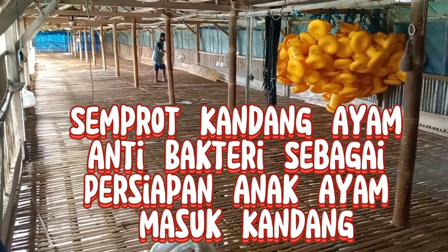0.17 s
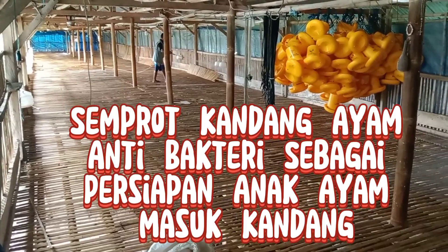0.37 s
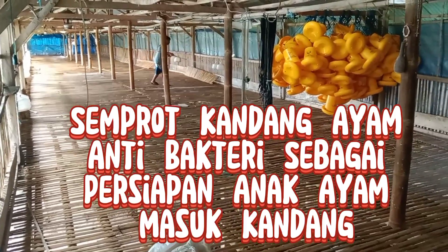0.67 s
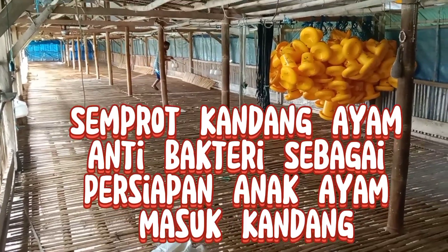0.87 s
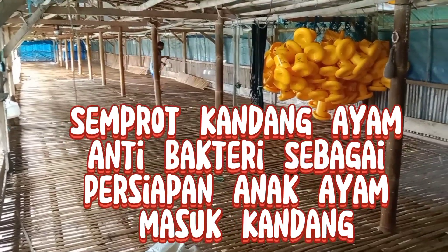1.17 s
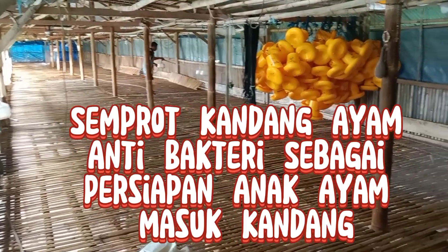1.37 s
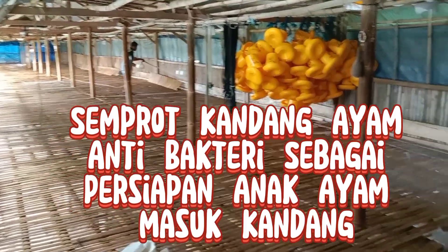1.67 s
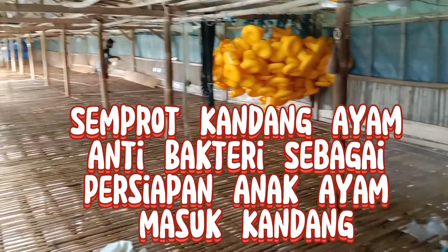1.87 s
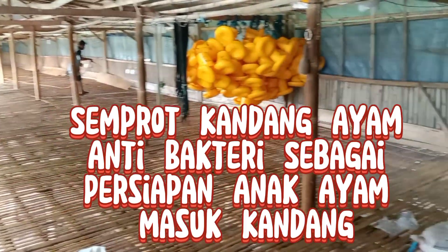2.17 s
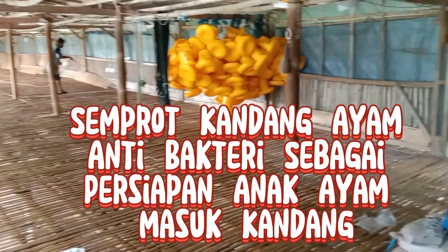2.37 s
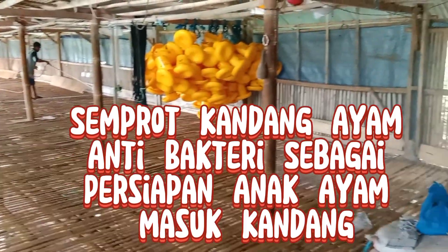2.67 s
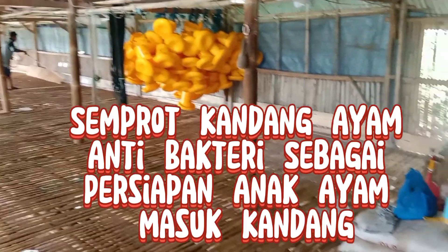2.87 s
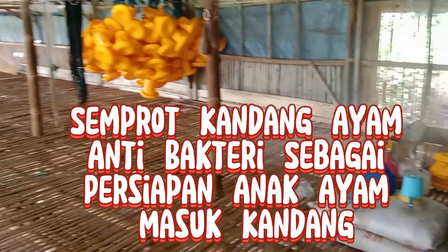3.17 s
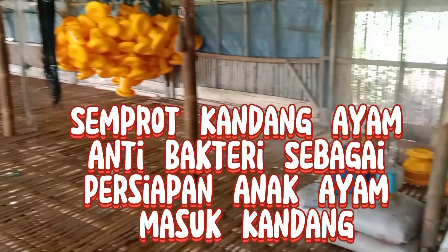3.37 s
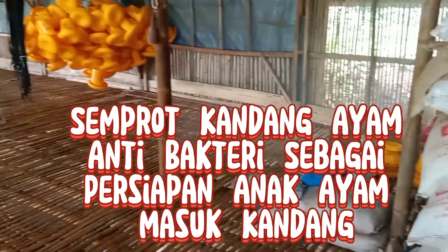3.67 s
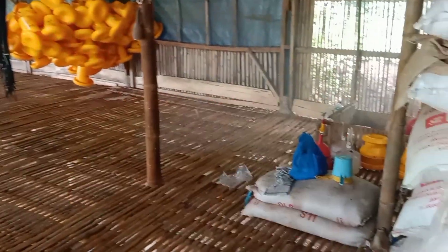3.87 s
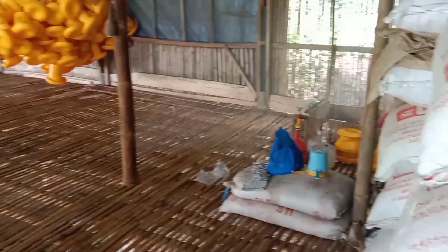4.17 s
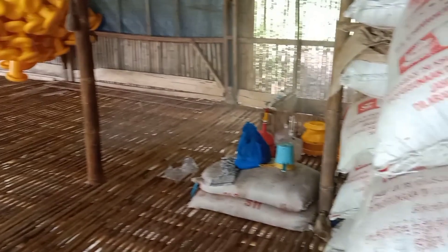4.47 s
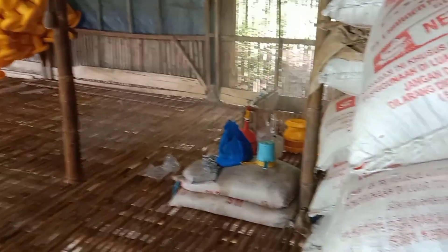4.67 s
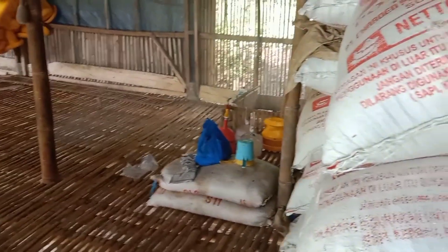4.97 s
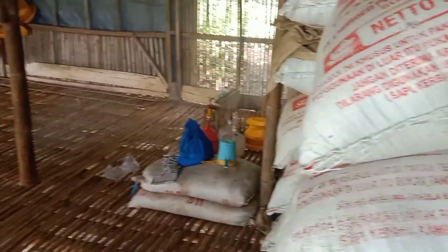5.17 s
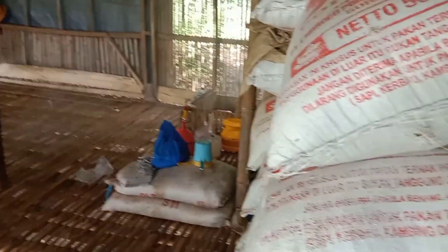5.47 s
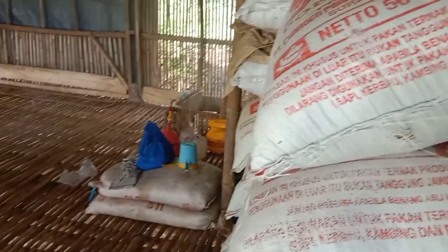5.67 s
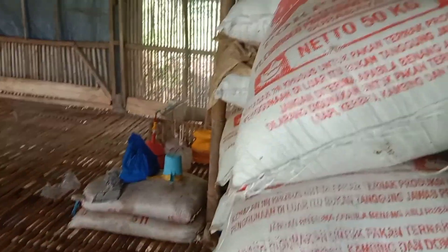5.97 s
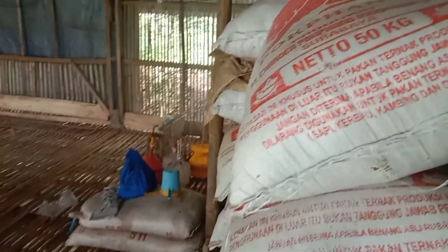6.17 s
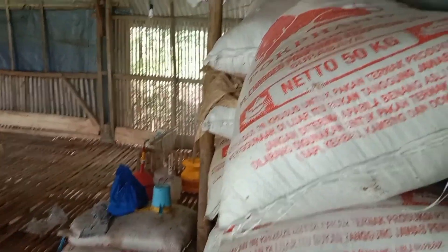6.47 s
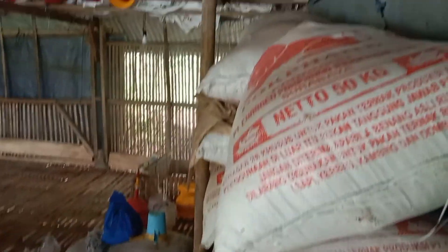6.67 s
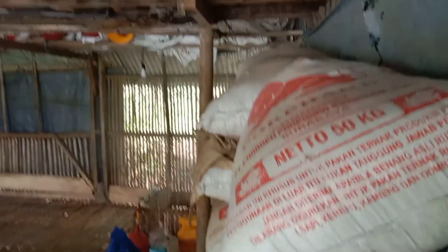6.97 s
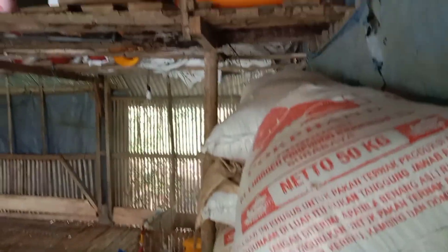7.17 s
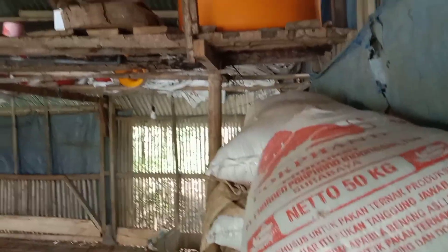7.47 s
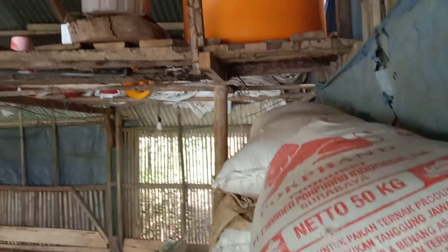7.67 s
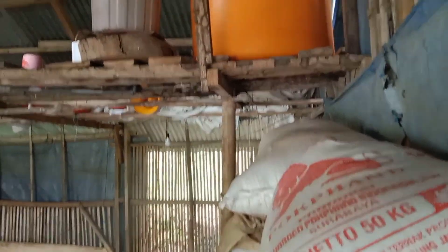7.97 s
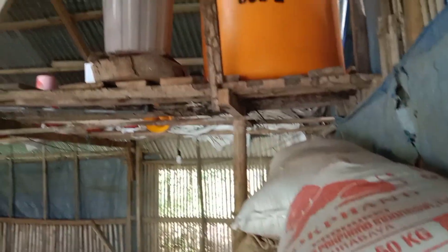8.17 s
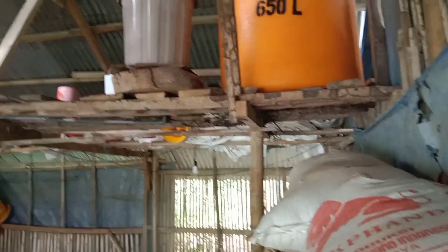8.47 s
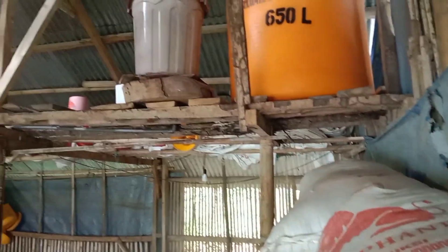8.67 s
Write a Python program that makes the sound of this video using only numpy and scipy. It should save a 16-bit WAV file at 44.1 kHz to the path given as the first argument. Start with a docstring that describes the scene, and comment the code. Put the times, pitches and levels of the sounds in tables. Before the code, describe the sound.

A spray nozzle hisses steadily in a long poultry house, with short hollow, gurgling swoops as the wand swings. About a second in, the jet hits a tarpaulin with a brief loud splatter. Softer splashes on the bamboo floor follow, and a loose slat clacks once midway. The hiss grows brighter as the microphone turns away, while a distant pump thuds faintly and rapidly underneath.

```python
"""A nozzle hisses as a worker sprays the slatted floor of a long poultry house.
The turbulent jet gives broadband noise, which brightens as the microphone turns slowly away.
A hollow tone, noise in a narrow resonance, swoops with each swing of the wand. Drops briefly blast
a tarpaulin wall and splash on the slats, and a loose slat clacks.
Behind it all lie the rapid, low thudding of a distant pump and the faint rush of the air."""
import sys
import numpy as np
from scipy import signal
from scipy.fft import rfft, irfft, next_fast_len
from scipy.io import wavfile
from scipy.ndimage import uniform_filter1d, map_coordinates

SR = 44100
rng = np.random.default_rng(int(sys.argv[2]) if len(sys.argv) > 2 else 0)


def store_wav(level_fs):
    """Save 16-bit WAV to argv[1]."""
    pcm = np.round(np.clip(np.atleast_2d(level_fs), -1, 1) * 32767)
    wavfile.write(sys.argv[1], SR, pcm.T.astype(np.int16))


N = 388080
T = np.arange(N) / SR

# Strength of the jet. Each row: time in seconds, hiss level in dB.
JET_LEVEL = [(0, -31), (.7, -28.5), (1.15, -29.5), (1.6, -29), (2.95, -29), (3.5, -31), (3.9, -28.5),
             (4.25, -31), (4.8, -30.2), (6.1, -30), (7.4, -28), (8.8, -27.5)]
# The microphone's turn. Each row: time in seconds, share of the turn from 0 to 1.
MIC_TURN = [(0, 0), (3.6, .03), (3.95, 0.48), (5.5, 0.55), (7.2, 1)]
# One swoop per swing. Each row: peak time in seconds, relative level in dB, pitch in Hz,
# nominal length in seconds.
WAND_SWOOPS = [(.209, -37.5, 1055, .046), (0.64, -34.5, 1053, 0.055), (.856, -28, 1044, 0.042),
               (1.075, -37, 1052, 0.12), (1.516, -33, 1017, 0.074), (1.722, -34.5, 1068, .12),
               (1.887, -40.5, 1150, .08), (2.13, -30.5, 1037, .1), (2.384, -33, 1055, 0.039),
               (2.548, -38.5, 1110, 0.053), (2.738, -42, 1114, .08), (2.979, -36.5, 1044, 0.048),
               (3.183, -31.5, 1038, .044), (3.397, -36, 1060, .1), (3.618, -28.5, 1058, 0.071),
               (3.858, -39.5, 1055, .064), (3.979, -38, 1120, 0.064), (4.208, -37, 1170, .11),
               (4.432, -41.5, 1099, .09), (4.666, -38, 1241, .076), (4.895, -41, 1041, .054),
               (5.09, -36.5, 1067, 0.082), (5.34, -34, 1028, 0.045), (5.524, -29.5, 1056, 0.089),
               (5.77, -36, 1031, 0.079), (6.177, -37, 1114, .15), (6.574, -42, 1096, 0.045),
               (6.806, -38, 1044, 0.07), (7.05, -45, 1080, 0.082), (7.241, -42, 1038, .086),
               (7.454, -35, 1045, .08), (7.819, -33.5, 1074, 0.088), (8.09, -43, 1070, 0.065),
               (8.287, -46, 1060, .066), (8.72, -43.5, 1044, .12)]
# The gurgle above the swoops. Each row: time in seconds, relative level in dB, pitch in Hz.
GURGLE_TRACK = [(0, -49, 1484), (1, -40.5, 1450), (1.7, -42, 1200), (2.8, -48, 1170), (3.4, -38, 1191),
                (4.25, -43, 1210), (4.75, -41, 1432), (5.4, -40.5, 1307), (6.4, -39.5, 1370),
                (7.4, -41.5, 1390), (7.75, -43.5, 1722), (8.8, -45, 1700)]
# The jet slaps the tarpaulin. Each row: peak time in seconds, level in dB, rise in seconds,
# 60 dB decay time in seconds, drumming in dB relative to the spatter.
TARP_BLASTS = [(1.215, -29, 0.024, 0.48, -14), (1.256, -13.7, .011, 0.49, -14),
               (1.395, -31.5, 0.012, 0.21, -6)]
# Soft low rumbles, and one brief low edge under a swoop. Each row: peak time in seconds, level in dB,
# pitch in Hz, nominal length in seconds.
SOFT_HOLLOW_TONES = [(.11, -57, 417, .09), (0.467, -44.5, 385, .045), (0.998, -52, 440, .12),
                     (1.16, -44, 455, 0.044), (1.615, -49, 340, .04), (4.015, -52, 424, .05),
                     (7.43, -50, 803, .04)]
# Impacts on the bamboo floor. Each row: peak time in seconds, level in dB.
SLAT_SPLASHES = [(.6, -33), (1.603, -23.5), (1.75, -31.5), (3.845, -32.5), (4.005, -32.5), (4.29, -35)]
SLAT_KNOCKS = [(4.879, -32), (4.896, -39)]
# Peaks and notches of the microphone port. Each row: centre in Hz, width in Hz, gain in dB.
PORT_BANDS = [(548, 38, 4), (2296, 190, 3.5), (3525, 210, 2.5), (4090, 200, -0.5), (6150, 89, -2),
              (7190, 100, -5.5)]

# Spectra of the sources. Each row: frequency in Hz, relative spectral density in dB.
HISS_FACING = [(700, -39), (1100, -13.5), (1500, -15), (1950, -18.5), (2400, -1), (2950, 2.5), (3900, -8),
               (4600, -1.5), (5150, 2), (5750, -4), (7350, -28.5), (8800, -25.5), (10400, -22.5),
               (11500, -60)]  # the jet before the turn
HISS_TURNED = [(700, -50), (1100, -18.5), (1700, -14.5), (2000, -18.5), (2400, -3.5), (3200, .6),
               (4100, -6.2), (4750, -0.4), (5500, -2), (6400, -13), (7500, -23.5), (9900, -23),
               (11500, -26), (13500, -61)]  # the jet after the turn
FINE_MIST = [(6000, -40), (9000, 4.5), (11800, 2), (13500, -7.5), (15500, -14)]
SWOOP_SPATTER = [(1000, -5), (1400, -6.5), (1650, -6.5), (2100, -4), (3200, -6), (6000, -30)]
TARP_SPATTER = [(300, -17), (600, -21), (820, -4.5), (1080, 1), (1500, -3.5), (1800, -6.5), (2900, -1.5),
                (3800, -9), (5300, -3), (6200, -20), (7300, -34), (10000, -39), (12000, -70)]
TARP_DRUM = [(100, -42), (190, -9.5), (300, 2), (520, 0), (800, 2.5), (1300, -18), (3000, -57)]
SPLASH_SPECTRUM = [(1200, -6), (2800, -3.5), (3900, -4), (5200, 3.5), (6500, -10.5), (8000, -25),
                   (11000, -29)]
BAMBOO_FLOOR = [(45, -11), (75, -6), (160, -13), (280, -14), (400, -17), (560, -5), (720, -15), (1150, -1),
                (1700, 0), (3000, -20), (7000, -40)]
PUMP_THUD = [(35, -40), (55, -32), (68, -8.5), (85, -13), (110, 4), (128, -2), (150, -2.5), (170, -22),
             (280, -20.5), (450, -21), (900, -74)]
HOUSE_AIR = [(20, -15), (45, -7), (70, 4.5), (130, 6.5), (200, 1.5), (300, 1.5), (420, -2.5), (540, -1.5),
             (700, -1), (1000, 2.5), (2000, -1.5), (8000, -32), (15000, -22)]


def nozzle():
    """Turbulence radiates broadband hiss; directivity changes its colour as the microphone turns."""
    surge_db = 1.2  # range of the surges that come with the swoops
    jet_db, = curves(JET_LEVEL)
    hiss = turning(patchy(HISS_FACING, depth_db=1), patchy(HISS_TURNED, depth_db=.58))
    surge = sum(amp(db) * swell(s, rise=.02, t60=.6) for s, db, _, _ in WAND_SWOOPS)
    flow_db = surge_db * (surge - surge.mean()) / surge.max() + .16 * wobble(6) + .49 * wobble(30)
    mist = turned_gain(facing_db=-50, turned_db=-23.5) * amp(1.2 * wobble(18)) * rush(FINE_MIST)
    return amp(jet_db + flow_db) * (hiss + mist)


def swoops():
    """Narrow resonances swoop as the wand swings; their envelope modulates a broader spatter."""
    low_cut_hz = 843
    tone = resonant_bursts(WAND_SWOOPS, width_hz=70, fall=.05, bend=.03, stretch=.66, skew=1.6)
    tone += lead_ins()
    chatter = warbles(count=150)
    envelope = np.sqrt(np.abs(uniform_filter1d(tone ** 2, size=1500)))
    spatter = envelope * patchy(SWOOP_SPATTER, depth_db=3.5)
    spray = amp(.7) * tone + chatter + gurgle() + amp(-4) * spatter
    return filtered(spray, lambda hz: 1 / np.sqrt(1 + (low_cut_hz / (hz + 1)) ** 20))


def lead_ins():
    """A resonance at the gurgle's pitch flares just before each swoop, partly following its level."""
    lead_s, length_s = .092, .06
    swoop_s, swoop_db = np.transpose(WAND_SWOOPS)[:2]
    peak_s = swoop_s - lead_s
    gurgle_db, hz = curves(GURGLE_TRACK, at=peak_s)
    level_db = gurgle_db + 1.2 + .2 * (swoop_db - swoop_db.mean())
    rows = np.transpose([peak_s, level_db, hz, np.full(len(hz), length_s)])
    return resonant_bursts(rows, width_hz=60, fall=.01032, bend=-.04, stretch=.65, skew=1.08)


def warbles(count):
    """Weaker, higher resonances sound at random, one in each equal slot of time."""
    when, size, height, length = rng.random((count, 4)).T
    peak_s = (np.arange(count) + when) / count * N / SR
    level_db = -48 + 6 * size - 3 * height
    hz = 1340 + 850 * height ** 1.2
    rows = np.transpose([peak_s, level_db, hz, .0308 + .0331 * length])
    return resonant_bursts(rows, width_hz=51, fall=.00484, bend=-.03, stretch=.862, skew=1.23)


def gurgle():
    """Frequency modulation of narrowband noise: the pitch arches up from one swoop to the next."""
    arch_share, width_hz = .13, 75
    level_db, centre_hz = curves(GURGLE_TRACK)
    marks = [0, *np.transpose(WAND_SWOOPS)[0], N / SR]
    swing = np.interp(T, marks, np.arange(len(marks)))
    pitch = centre_hz * (1 + arch_share * (np.sin(np.pi * swing) ** 2 - .5) + .03 * wobble(12))
    low_pass = lambda hz: 1 / (1 + (hz / width_hz) ** 4)
    real, imag = (filtered(rng.standard_normal(N), low_pass) for _ in range(2))
    tone = unit(on_carrier(real + 1j * imag, pitch))
    return amp(level_db - 7.5 + 3.5 * wobble(18)) * tone


def tarpaulin():
    """Drop impacts drive the sheet as a membrane: it rattles and drums."""
    spatter = unit(patchy(TARP_SPATTER, depth_db=1.5) * amp(.56 * wobble(260)))
    drum = rush(TARP_DRUM)
    return sum(amp(db) * swell(s, rise, t60) * (spatter + amp(drum_db) * drum)
               for s, db, rise, t60, drum_db in TARP_BLASTS)


def soft_hollow_tones():
    """Narrowband noise gives soft low rumbles, and one brief low edge under a swoop."""
    return resonant_bursts(SOFT_HOLLOW_TONES, width_hz=86, fall=.0185, bend=0, stretch=.99, skew=1)


def splashes():
    """Impact noise flares as the jet breaks up on the slats; more fizz is heard after the turn."""
    splash = rush(SPLASH_SPECTRUM)
    fizz = unit(rush(FINE_MIST) * amp(3 * wobble(270)))
    envelope = sum(amp(db) * swell(s, rise=.016, t60=.45) for s, db in SLAT_SPLASHES)
    return envelope * (splash + turned_gain(facing_db=-42, turned_db=-15) * fizz)


def knocks():
    """Damped vibration: a loose slat's clack dies quickly, the floor's shudder more slowly."""
    clack = sum(amp(db) * swell(s, rise=.0004, t60=.012) for s, db in SLAT_KNOCKS)
    shudder = sum(amp(db) * swell(s, rise=.001, t60=.14) for s, db in SLAT_KNOCKS)
    return (clack + amp(-3.5) * shudder) * rush(BAMBOO_FLOOR)


def pump():
    """The strokes form a nearly periodic impulse train; only its low frequencies carry this far."""
    first_s, strokes_per_s, jitter_s, scatter_db = .046, 13.69, .00021, 1.9
    times = np.arange(first_s, N / SR - .01, 1 / strokes_per_s)
    timing, strength = rng.standard_normal((len(times), 2)).T
    samples = np.clip(np.round((times + jitter_s * timing) * SR).astype(int), 0, N - 1)
    strokes = np.bincount(samples, amp(scatter_db * strength), N)
    return amp(-57.5) * coloured(strokes, PUMP_THUD)


def air():
    """Stationary noise: the still air of the house sets a faint floor."""
    return amp(-56) * rush(HOUSE_AIR)


def house(x, t60, wet_db):
    """Reverberation: reflections from posts, floor and roof add an exponentially decaying tail."""
    t = np.arange(SR // 2) / SR
    tail = rng.standard_normal(len(t)) * np.exp(-np.log(1000) * t / t60)
    echo = signal.fftconvolve(x, tail / np.linalg.norm(tail))[:N]
    return (x + amp(wet_db) * echo) / np.hypot(1, amp(wet_db))


def resonant_bursts(rows, width_hz, fall, bend, stretch, skew):
    """Noise bursts in a gliding resonance: the narrower the band, the slower the flutter."""
    out = np.zeros(N + SR)
    t = np.arange(-SR // 4, SR // 4) / SR  # time around the burst's peak
    offset_hz = np.fft.fftfreq(len(t), 1 / SR)
    for s, db, hz, length in rows:
        u = t / (length * stretch)
        envelope = 1 / np.cosh(2 * u * skew ** -np.sign(u))  # skew above 1: fast rise, slow fade
        white = rng.standard_normal(len(t)) + 1j * rng.standard_normal(len(t))
        flutter = np.fft.ifft(np.fft.fft(white) / (1 + (offset_hz / width_hz) ** 4))
        pitch = hz * (1 - fall * np.tanh(u) + bend * np.tanh(u) ** 2)
        burst = envelope * on_carrier(flutter, pitch)
        start = round(s * SR) + SR // 4
        out[start:start + len(t)] += amp(db) * burst * np.linalg.norm(envelope) / np.linalg.norm(burst)
    return out[SR // 2:][:N]


def on_carrier(flutter, hz):
    """Modulation shifts a slow complex flutter up to a band around hz."""
    return np.real(flutter * np.exp(2j * np.pi * np.cumsum(hz) / SR))


def turning(facing, turned):
    """An equal-power cross-fade follows the microphone's turn."""
    turn = np.clip(curves(MIC_TURN)[0], 0, 1)
    return np.sqrt(1 - turn) * facing + np.sqrt(turn) * turned


def turned_gain(facing_db, turned_db):
    """Powers add to give a gain that moves between two levels with the turn."""
    return np.hypot(turning(amp(facing_db), 0), turning(0, amp(turned_db)))


def swell(s, rise, t60):
    """A Gaussian rise to time s, then exponential decay by 60 dB in t60 seconds."""
    t = T - s
    return np.exp(-.5 * (np.minimum(t, 0) / rise) ** 2 - np.log(1000) * np.maximum(t, 0) / t60)


def patchy(spectrum, depth_db):
    """Random amplitude modulation makes each band of a coloured noise swell and sink on its own."""
    bands = signal.stft(rng.standard_normal(N), nperseg=512)[2]
    field = uniform_filter1d(rng.standard_normal(bands.shape), size=6, axis=0)  # smooth in frequency
    field = uniform_filter1d(field, size=12, axis=1)  # and in time
    noise = signal.istft(bands * amp(depth_db * unit(field)), nperseg=512)[1][:N]
    return coloured(noise, spectrum)


def rush(spectrum):
    """Filtering white noise gives coloured noise, at rms 1."""
    return coloured(rng.standard_normal(N), spectrum)


def coloured(x, spectrum):
    """Spectral shaping of x, interpolated in log frequency, at rms 1."""
    points_hz, db = np.transpose(spectrum)
    edges = np.log([points_hz[0] / 2, *points_hz, points_hz[-1] * 2])
    levels = [-120, *db, -120]
    return unit(filtered(x, lambda hz: amp(np.interp(np.log(hz + 1), edges, levels))))


def filtered(x, response):
    """Linear filtering multiplies the spectrum by a frequency response."""
    size = next_fast_len(N + 8192)
    return irfft(rfft(x, size) * response(np.fft.rfftfreq(size, 1 / SR)), size)[:N]


def wobble(rate):
    """Spline interpolation through random knots, rate of them a second."""
    return map_coordinates(rng.standard_normal(int(N * rate / SR) + 4), [T * rate])


def curves(rows, at=T):
    """Linear interpolation of each column after the time."""
    times, *columns = np.transpose(rows)
    return [np.interp(at, times, column) for column in columns]


def unit(x):
    """Normalisation to rms 1."""
    return x / np.sqrt(np.mean(np.abs(x) ** 2) + 1e-20)


def amp(db):
    """Decibels to amplitude ratio."""
    return 10 ** (np.asarray(db) / 20)


def scene():
    """Superposition: the pressures of all sources add, the same in both channels."""
    hiss = house(nozzle(), t60=.035, wet_db=-11)
    tones = house(swoops(), t60=.25, wet_db=-9)
    mono = hiss + tones + tarpaulin() + soft_hollow_tones() + splashes() + knocks() + pump() + air()
    return np.array([mono, mono])


def record(dry):
    """The microphone's frequency response: narrow peaks and notches of its port, and a band limit."""
    top_hz = 15450

    def response(hz):
        port_db = sum(db * np.exp(-((hz - centre) / width) ** 2) for centre, width, db in PORT_BANDS)
        return amp(port_db) * (hz < top_hz)

    return np.array([filtered(channel, response) for channel in dry])


dry = scene()
out = record(dry)
store_wav(out)
```